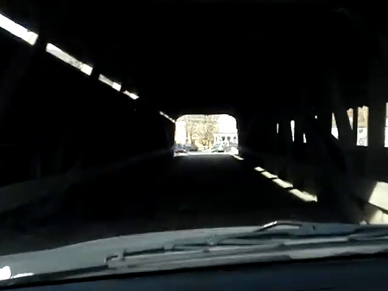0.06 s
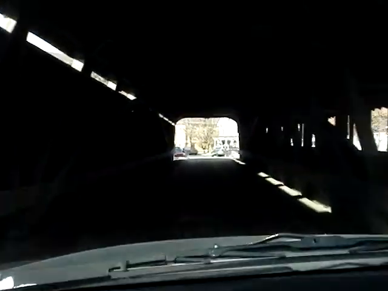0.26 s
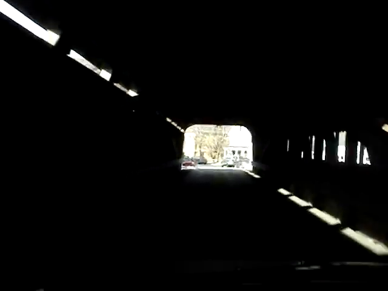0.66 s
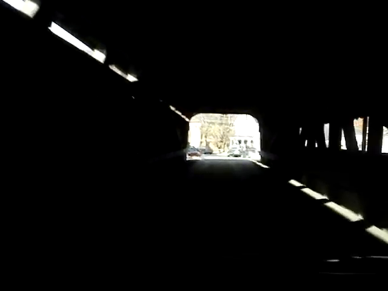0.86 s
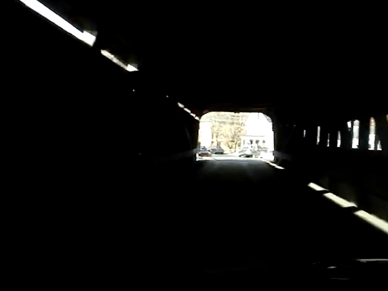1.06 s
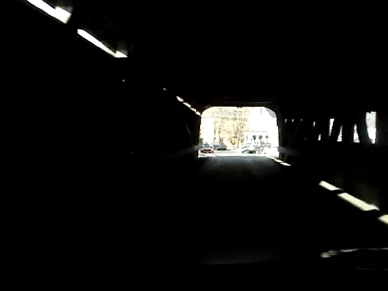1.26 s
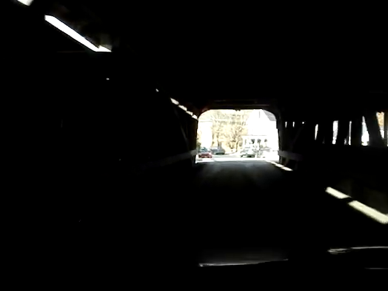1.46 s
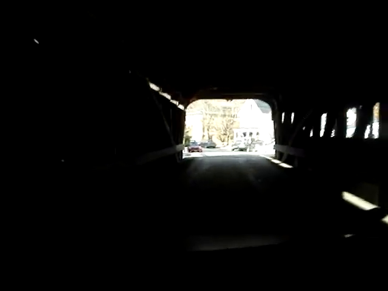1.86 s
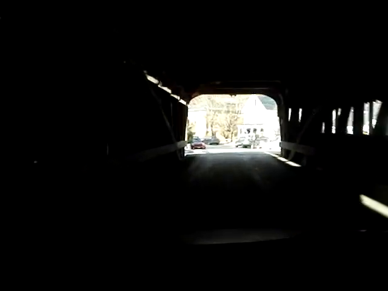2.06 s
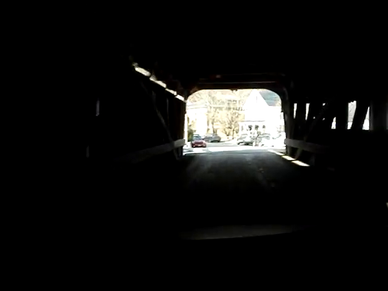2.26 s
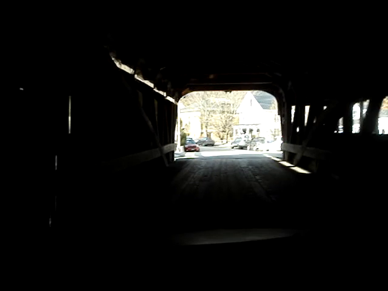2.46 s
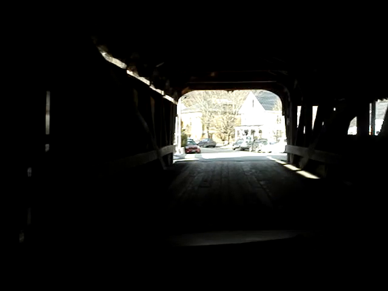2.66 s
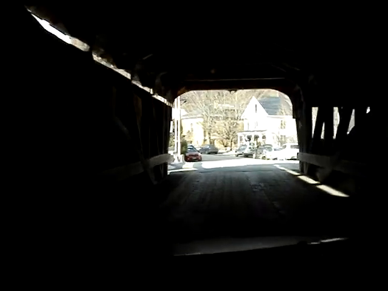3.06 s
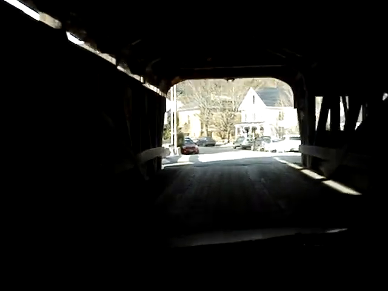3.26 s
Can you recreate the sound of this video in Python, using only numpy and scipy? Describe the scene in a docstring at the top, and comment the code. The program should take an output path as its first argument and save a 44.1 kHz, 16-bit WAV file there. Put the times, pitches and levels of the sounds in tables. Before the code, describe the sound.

A low, uneven tyre rumble fills the cabin of a car crossing a covered wooden bridge. Muffled plank knocks and thuds come from below, while boards clack and crack just outside, over gritty rasping, faint engine drone and hiss.

```python
"""A covered wooden bridge, heard from a microphone inside a car rolling slowly through it.
Close below, the tyres rumble on the deck and rasp on grit; the cabin booms over a faint engine hum.
Loose planks knock, muffled by the car body, and the wheels thud over joints.
Just outside, boards rap and clack, strained timber cracks and grit crunches.
Behind it all lies a steady hiss, with thin high swishes and brief, faint treble buzzes."""
import sys
import numpy as np
from scipy import signal
from scipy.fft import rfft, irfft
from scipy.io import wavfile

SR = 44100
rng = np.random.default_rng(int(sys.argv[2]) if len(sys.argv) > 2 else 0)


def master(y):
    """Save y as 16-bit WAV."""
    cut = np.clip(np.atleast_2d(y).T, -1, 1)
    pcm = np.round(cut * 32767)  # scale
    wavfile.write(sys.argv[1], SR, pcm.astype(np.int16))


N = 149940
T = np.arange(N) / SR


def amp(db):
    """Decibels to gain."""
    return 10 ** (np.asarray(db) / 20)


def unit(x):
    """Scales to rms 1."""
    return x / np.sqrt(np.mean(x ** 2) + 1e-20)


def level(points):
    """Gain along a curve of (time [s], level [dB])."""
    return amp(np.interp(T, *np.transpose(points)))


def add(mix, start_s, sound):
    """Mixes a sound in at a time."""
    at = round(start_s * SR)
    sound = sound[max(-at, 0):]
    part = mix[max(at, 0):][:len(sound)]
    part += sound[:len(part)]


def colour(x, spectrum):
    """Filters by a spectrum, keeping the power of white noise."""
    hz, db = np.transpose(spectrum)
    log_hz = np.log(np.fft.rfftfreq(N, 1 / SR) + 1)
    gain = amp(np.interp(log_hz, np.log(hz), db))
    return irfft(rfft(x) * unit(gain), N)


def wander(rate_hz):
    """Smooth random drift of rms 1."""
    hz = np.fft.rfftfreq(N, 1 / SR)
    lowpass = np.exp(-(hz / rate_hz) ** 2) * (hz > 0)
    return unit(irfft(rfft(rng.standard_normal(N)) * lowpass, N))


def swell(length_s):
    """Time and envelope of a burst that rises quickly and fades."""
    t = np.arange(0, length_s, 1 / SR)
    return t, np.sin(np.pi * (t / length_s) ** 0.6)


# tyre rumble in the cabin (frequency [Hz], relative level [dB])
RUMBLE_SPECTRUM = [(25, -50), (45, -3.5), (70, 0), (105, -2), (135, -2.5), (175, -5), (230, -7),
                   (285, -7.5), (440, -14), (560, -19), (700, -26), (1200, -43), (3000, -75)]
# roughness of the deck, heard as rumble (time [s], level [dB])
DECK_ROUGHNESS = [(0, -39), (.14, -37), (.33, -33.5), (.41, -35), (.47, -36.5), (.54, -35.5), (.64, -35),
                  (.87, -34.5), (.95, -36.5), (1.08, -34), (1.19, -37.5), (1.32, -33), (1.41, -38.5),
                  (1.48, -34.5), (1.54, -37), (1.86, -33.5), (1.98, -41), (2.12, -33), (2.29, -38.5),
                  (2.42, -31), (2.49, -37.5), (2.56, -33), (2.63, -38), (2.73, -38), (2.81, -36),
                  (2.96, -39), (3.06, -32.5), (3.14, -40.5), (3.24, -38.5), (3.4, -41)]

def rumble(jolt_db=1.8):
    """The tyres shake the cabin from below the microphone; uneven boards jolt the level."""
    jolts = amp(jolt_db * wander(rate_hz=23.7))
    return unit(colour(rng.standard_normal(N), RUMBLE_SPECTRUM)) * jolts * level(DECK_ROUGHNESS)


def boom(centre_hz=43.8, width_hz=10.8, relative_db=-3.5, evenness=0.41):
    """All around the microphone, the cabin booms at a deep, fairly even pitch."""
    hz = np.fft.fftfreq(N, 1 / SR)
    band = np.exp(-((hz - centre_hz) / width_hz) ** 2)
    sway = np.fft.ifft(np.fft.fft(rng.standard_normal(N)) * band)
    compression = (.5 + unit(abs(sway)) ** 2) ** (evenness / 2)
    return amp(relative_db) * unit(sway.real / compression)


# loose planks under the wheels (time [s], relative level [dB], treble cutoff [Hz])
PLANK_KNOCKS = [(0.255, -26.5, 332), (0.2711, -10.5, 505), (.289, -26, 513), (0.3103, -11.5, 346),
                (.327, -14, 348), (.374, -24, 347), (.846, -26.5, 480), (1.463, -28.5, 305),
                (1.793, -15, 358), (2.406, -28.5, 330), (2.505, -23.5, 420), (2.528, -16, 376),
                (3.07, -30, 390)]
# ring of a plank (frequency [Hz], relative level [dB], t60 [s])
PLANK_MODES = [(165.6, -9.5, 0.22), (190.6, -14.5, 0.075), (273.6, -4.5, 0.1), (335.4, -3.5, 0.04),
               (401, -11, 0.066), (431, -8, 0.087), (493, -19, 0.13), (530, -18, 0.1)]

def knocks():
    """Planks ring briefly right under the floor and reach the microphone through the car body."""
    out, t = np.zeros(N), np.arange(SR // 4) / SR
    ring = sum(amp(db - 60 * t / t60) * np.cos(2 * np.pi * hz * t) for hz, db, t60 in PLANK_MODES)
    for start, db, cutoff_hz in PLANK_KNOCKS:
        add(out, start, amp(db) * muffle(ring, cutoff_hz))
    return out


def muffle(blow, cutoff_hz, lag_hz=440, lag_width_hz=190, order=9):
    """The car body cuts the top off a blow and delays its middle, smearing it over a few cycles."""
    radius = np.exp(-np.pi * lag_width_hz / SR)
    poles = np.array([1, -2 * radius * np.cos(2 * np.pi * lag_hz / SR), radius ** 2])
    smeared = signal.lfilter(poles[::-1], poles, blow)  # all-pass
    return signal.sosfilt(signal.butter(order, cutoff_hz, fs=SR, output="sos"), smeared)


# wheels dropping over deck joints (time [s], relative level [dB], pitch [Hz])
JOINT_THUDS = [(0.32, -21, 139), (0.332, -25, 118), (0.718, -19.5, 108), (1.061, -22.5, 85),
               (1.306, -25.5, 104), (1.667, -24.5, 94.5), (1.81, -38, 48.3), (2.54, -22, 49.2),
               (2.553, -24, 116), (2.789, -26, 50), (3.035, -20.5, 95)]

def thuds(rise_s=0.0046, t60_cycles=7.3):
    """The suspension passes a few deep cycles up into the cabin."""
    out, t = np.zeros(N), np.arange(SR // 3) / SR
    onset = 1 - np.exp(-(t / rise_s) ** 2)
    for start, db, hz in JOINT_THUDS:
        decay = amp(db - 60 * t * hz / t60_cycles)
        add(out, start, 2 * onset * decay * np.sin(2 * np.pi * hz * t))
    return out


# thin boards rapping (time [s], relative level [dB])
BOARD_RAPS = [(.4165, -31.5), (0.744, -29), (0.7571, -25.5), (.934, -32), (1.038, -31.5), (2.117, -45),
              (2.443, -39)]
# ring of a thin board (frequency [Hz], relative level [dB], t60 [s])
RAP_MODES = [(468, -4, .08), (508, -6, 0.082), (621, -7.5, 0.079), (862, -10, 0.029), (1510, -16.5, 0.1)]

def raps(rise_s=0.00093):
    """Thin boards close by ring with a higher, hollow rap."""
    out, t = np.zeros(N), np.arange(SR // 5) / SR
    onset = 1 - np.exp(-t / rise_s)
    ring = sum(amp(db - 60 * t / t60) * np.sin(2 * np.pi * hz * t) for hz, db, t60 in RAP_MODES)
    for start, db in BOARD_RAPS:
        add(out, start, amp(db) * onset * ring)
    return out


# light clacks of boards (time [s], relative level [dB])
BOARD_CLACKS = [(.2855, -30.5), (0.337, -43), (.3703, -44), (0.427, -46), (.479, -35.5), (0.804, -34.5),
                (.937, -43), (1.086, -45), (1.356, -34.5), (1.436, -36.5), (1.571, -47), (1.634, -40.5),
                (1.848, -42), (1.929, -46), (2.002, -37), (2.094, -41), (2.316, -33), (2.476, -42.5),
                (2.537, -34.5), (2.592, -47), (2.62, -33), (2.716, -48), (3.037, -45.5), (3.197, -47)]
# rasp of a clack (frequency [Hz], relative level [dB])
CLACK_SPECTRUM = [(400, -32), (1100, 3), (1500, 6.5), (1900, 6), (2400, -10), (3200, -19), (4900, -8),
                  (6000, -26), (10000, -39)]
# ring of a clack (frequency [Hz], relative level [dB], t60 [s])
CLACK_RING = [(1434, -10, 0.036), (1706, -11, 0.029), (1964, -5, 0.037), (2810, -17, 0.018)]

def clacks(rise_s=0.0008, decay_s=0.0062, echo_db=-16, echo_s=0.038,
           rasp_db=-8, ring_db=-2.0, detune=0.027):
    """Dry wood just outside: a rasp, a very short ring and a brief echo from the bridge walls."""
    envelope, rings, t = np.zeros(N), np.zeros(N), np.arange(SR // 5) / SR
    decay = np.exp(-t / decay_s) + amp(echo_db) * np.exp(-t / echo_s)
    for start, db in BOARD_CLACKS:
        onset = amp(db) * (1 - np.exp(-t / rise_s))
        add(envelope, start, onset * decay)
        for hz, mode_db, t60 in CLACK_RING:
            pitch = hz * (1 + detune * rng.standard_normal())
            add(rings, start, onset * amp(mode_db - 60 * t / t60) * np.sin(2 * np.pi * pitch * t))
    rasp = colour(envelope * rng.standard_normal(N), CLACK_SPECTRUM)
    return amp(rasp_db) * rasp + amp(ring_db) * rings


# timber cracking (time [s], relative level [dB])
TIMBER_CRACKS = [(.2865, -36.5), (0.296, -41.5), (.574, -40.5), (.811, -43), (0.883, -43.5), (1.149, -44),
                 (1.984, -45.5), (2.067, -49), (2.124, -43.5), (2.167, -44), (2.221, -46), (2.315, -50),
                 (2.591, -43.5), (2.621, -50), (2.654, -41)]
# tone of a crack (frequency [Hz], relative level [dB])
CRACK_SPECTRUM = [(1200, -5), (2700, 3.5), (3600, -9.5), (4600, -12), (5500, -27), (10000, -30)]

def cracks(rise_s=0.00099, decay_s=0.0041):
    """Strained timber around the car gives small, sharp cracks."""
    envelope, t = np.zeros(N), np.arange(SR // 10) / SR
    snap = (1 - np.exp(-t / rise_s)) * np.exp(-t / decay_s)
    for start, db in TIMBER_CRACKS:
        add(envelope, start, amp(db) * snap)
    return colour(envelope * rng.standard_normal(N), CRACK_SPECTRUM)


# grit under a tread (time [s], length [s], level [dB])
GRIT_CRUNCHES = [(0.283, 0.02, -38), (0.519, 0.0086, -42), (0.597, 0.041, -43.5), (0.73, 0.062, -42.5),
                 (0.845, 0.064, -45), (0.92, 0.04, -46), (1.036, 0.027, -46), (1.09, 0.035, -48.5),
                 (1.569, 0.031, -44.5), (2.105, 0.031, -40), (2.257, 0.02, -42), (2.55, 0.02, -47)]
# tone of a crunch (frequency [Hz], relative level [dB])
CRUNCH_SPECTRUM = [(250, -4.5), (600, 7.5), (1000, 1), (1600, -4), (2800, -8.5), (4200, -16.5), (6000, -24),
                   (10000, -34)]

def crunches(grain_db=3):
    """Down at the wheels, grit is crushed in short, grainy bursts."""
    envelope = np.zeros(N)
    for start, length, db in GRIT_CRUNCHES:
        add(envelope, start, amp(db) * swell(length)[1])
    grains = unit(rng.standard_normal(N) * amp(grain_db * wander(rate_hz=440)))
    return colour(envelope * grains, CRUNCH_SPECTRUM)


# tone of the treads (frequency [Hz], relative level [dB])
TREAD_SPECTRUM = [(150, -29.5), (330, -2.5), (460, 7), (620, 3), (720, -4.5), (850, -1), (1300, -9),
                  (1900, -11), (2800, -15), (4000, -20), (6000, -22.5), (10000, -33)]
# tread noise at the microphone (time [s], level [dB])
TREAD_CURVE = [(0, -51.5), (.2, -49.5), (.4, -44), (.6, -44.5), (.7, -47), (.77, -44.5), (1.05, -45.5),
               (1.3, -47.5), (1.6, -47.5), (1.9, -49.5), (2.14, -46.5), (2.4, -47.5), (2.62, -46.5),
               (2.84, -47.5), (2.97, -48.5), (3.05, -46.5), (3.25, -51.5), (3.4, -47)]

def treads(stones_per_s=800, spread_db=3.5, grain_s=0.0032, grit_share=0.51):
    """The treads rasp on gritty boards below: a tiny burst for each stone, over smooth noise."""
    hits = rng.random(N) < stones_per_s / SR
    stones = hits * amp(spread_db * np.minimum(rng.exponential(1, N), 4))
    envelope = signal.lfilter([1], [1, -np.exp(-1 / (grain_s * SR))], stones)
    grains = unit(envelope * rng.standard_normal(N))
    rasp = np.sqrt(grit_share) * grains + np.sqrt(1 - grit_share) * rng.standard_normal(N)
    return unit(colour(rasp, TREAD_SPECTRUM)) * level(TREAD_CURVE)


# low drone, probably the engine (frequency [Hz], level relative to the rumble [dB])
ENGINE_TONES = [(133, -11.5), (272, -20.5)]

def engine(drift=0.01105, waver_db=3.5):
    """A faint drone in the cabin, wavering in pitch and level."""
    phase_per_hz = 2 * np.pi * np.cumsum(1 + drift * wander(rate_hz=2.59)) / SR
    return sum(amp(db) * unit(np.sin(hz * phase_per_hz) * amp(waver_db * wander(rate_hz=13)))
               for hz, db in ENGINE_TONES)


# background hiss (frequency [Hz], relative level [dB])
HISS_SPECTRUM = [(300, 5.5), (1000, 1.5), (2000, -12), (4000, -14), (5600, -17.5), (7500, -17.5),
                 (9000, -19), (10200, -27)]
# high swishes and treble buzzes (time [s], length [s], level [dB], buzz depth [ratio])
HIGH_SWISHES = [(-.02, .08, -58, 1.3), (0.519, 0.012, -61, .2), (0.554, 0.08, -56.5, 0.9),
                (0.857, 0.026, -58, 0.2), (.881, 0.022, -54.5, 0), (1.488, 0.11, -59.5, 1.2),
                (2.022, 0.15, -66, 1.2)]
# tone of a swish or buzz (frequency [Hz], relative level [dB])
SWISH_SPECTRUM = [(2000, -36), (4500, 3.5), (5800, 2), (8000, -2), (10000, -9)]

def hiss(hiss_db=-52, flicker_db=0.5, buzz_hz=66):
    """A steady background hiss, with a few thin high swishes and brief, faint treble buzzes."""
    envelope = np.zeros(N)
    for start, length, db, depth in HIGH_SWISHES:
        t, shape = swell(length)
        buzz = (1 + depth * np.sin(2 * np.pi * buzz_hz * t)) / np.sqrt(1 + depth ** 2)
        add(envelope, start, amp(db) * shape * buzz)
    gain = amp(hiss_db + flicker_db * wander(rate_hz=7.8))
    steady = gain * colour(rng.standard_normal(N), HISS_SPECTRUM)
    return steady + colour(envelope * rng.standard_normal(N), SWISH_SPECTRUM)


def scene():
    """Everything at one microphone in the cabin; boom and drone swell with the rumble."""
    tyres = rumble() + treads()
    cabin = (boom() + engine()) * level(DECK_ROUGHNESS)
    bridge = knocks() + thuds() + raps() + clacks() + cracks()
    return (tyres + cabin + bridge + crunches() + hiss())[None]


def record(dry, cutoff_hz=10200):
    """The recorder cuts off the highest treble."""
    taps = signal.firwin(1023, cutoff_hz, window=("kaiser", 9), fs=SR)
    return signal.oaconvolve(dry, taps[None], "same")


dry = scene()
out = record(dry)
master(out)
```